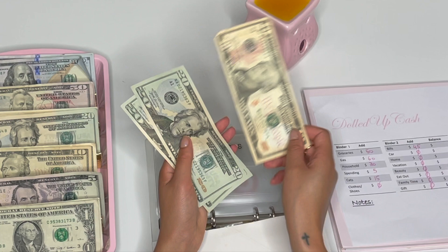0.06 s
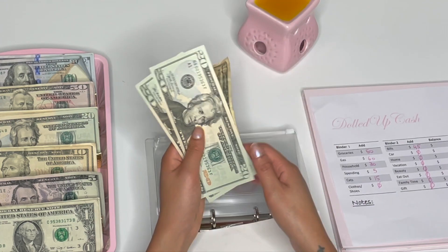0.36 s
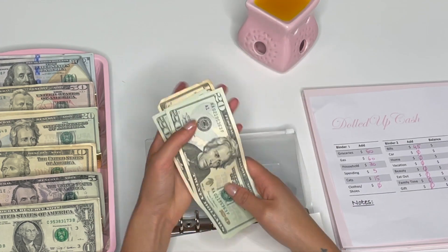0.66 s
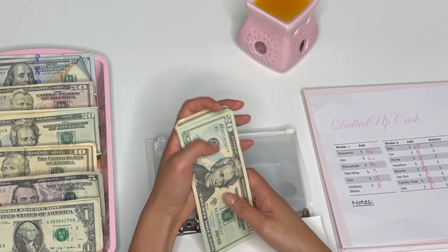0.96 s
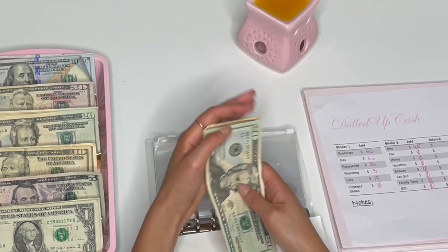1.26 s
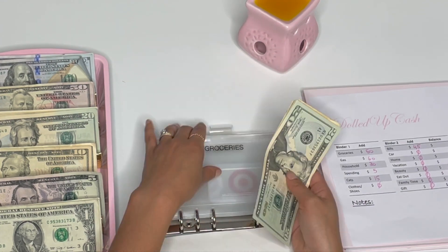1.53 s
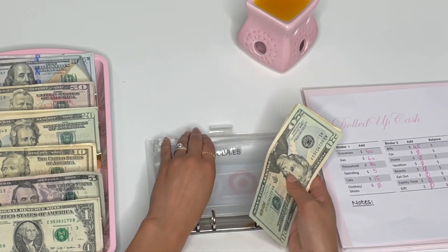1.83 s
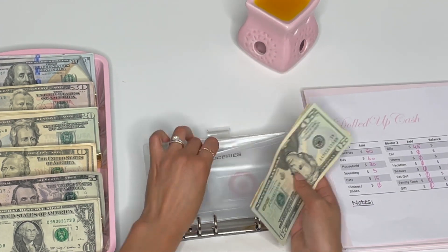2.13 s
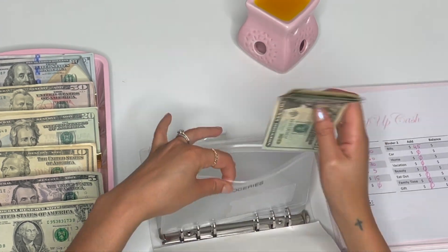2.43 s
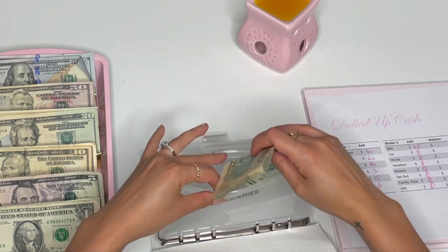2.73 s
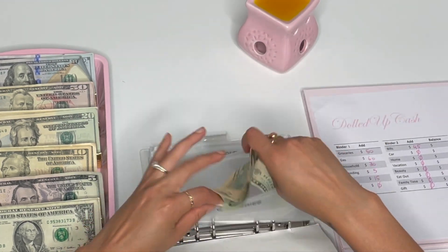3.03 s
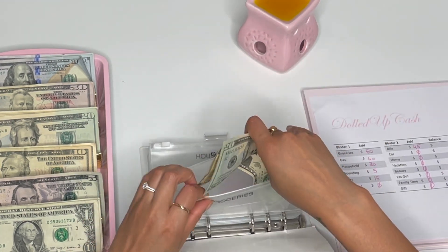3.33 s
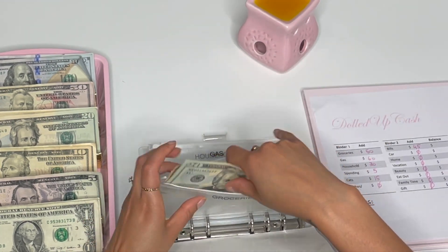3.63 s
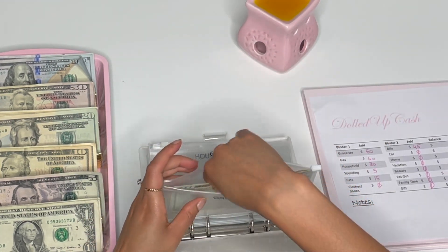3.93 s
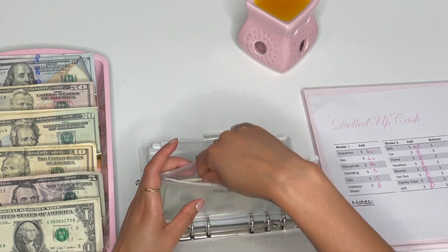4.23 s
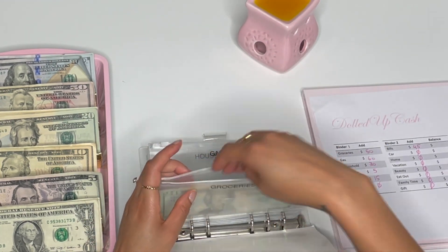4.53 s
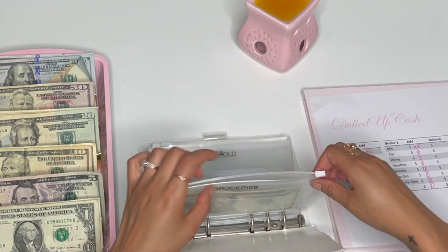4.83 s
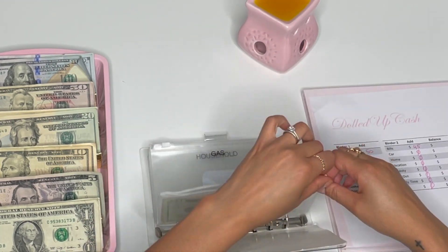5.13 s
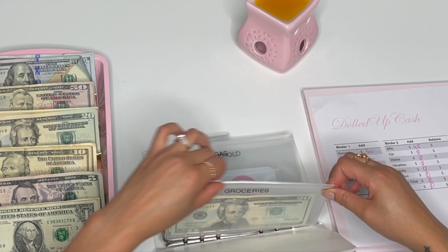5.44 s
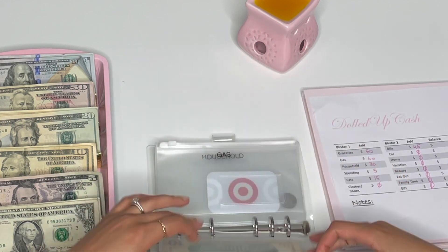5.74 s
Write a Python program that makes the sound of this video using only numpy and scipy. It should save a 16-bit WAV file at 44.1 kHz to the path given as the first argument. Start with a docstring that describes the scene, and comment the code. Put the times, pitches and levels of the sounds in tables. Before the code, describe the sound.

For the first second or so, paper banknotes rustle in short, crisp strokes close to the microphone, with a sharp crack at about 0.3 seconds and smaller snaps as they are squared. At 1.3 seconds hands land on the table with a soft, deep boom. Fingers rub a plastic binder pocket, and the cover knocks lightly near 1.9 seconds over a low rumble. At about 2.3 seconds the pocket opens with a loud pop. From 2.5 to 4.5 seconds the film crinkles and the notes slide in, with irregular sharp snaps, strongest around 2.6, 2.9 and 3.9 seconds. Lighter rustles and clicks follow as the pocket is closed and turned. Around 5.7 seconds the cover meets the table in a few quick hollow knocks, followed by last plastic snaps. The bare room gives a short echo and a faint, steady low background noise.

```python
"""At a table in a bare room, hands square a few banknotes and slip them into a plastic binder pocket.
Paper and film rustle in strokes made of tiny stick-slip clicks; creases snap, taut sheets crack, and
the pocket opens with a loud pop. Underneath, hands set the table booming softly and the binder's cover
knocks on it. A close pair of microphone ports hears it all, with the room's echo."""
import sys
import numpy as np
from scipy import signal
from scipy.fft import rfft, irfft, next_fast_len
from scipy.io import wavfile
from scipy.ndimage import uniform_filter1d

SR = 44100
rng = np.random.default_rng(int(sys.argv[2]) if len(sys.argv) > 2 else 0)


def wrap_up_sound(samples):
    """Save the sound to the file named by the first command line argument, as 16-bit audio."""
    columns = np.atleast_2d(samples).T
    # keep every value between -1 and 1, then stretch to whole-number steps
    tamed = np.clip(columns, -1, 1)
    steps = np.round(tamed * 32767).astype(np.int16)
    wavfile.write(sys.argv[1], SR, steps)


N = 264141
TOP_HZ = 15900

# room tone: (frequency [Hz], level [dB])
ROOM_TONE = [(20, -108), (60, -49), (200, -54), (500, -72), (2000, -76.5), (7000, -80), (15000, -110)]
# reverb decay: (frequency [Hz], t60 [s])
ROOM_DECAY = [(150, 0.76), (1000, 0.54), (4000, 0.57), (9000, 0.52), (15000, 0.55)]
# reverb width: (frequency [Hz], left-right correlation [0..1])
ROOM_CORRELATION = [(130, 0.67), (400, 0.65), (750, 0.023), (1100, 0.5), (1800, 1), (4000, 1), (14000, 1)]
# how far the right port leads the left: (frequency [Hz], phase [rad])
PORT_LEAD = [(2500, 0), (3300, 0.9), (5300, 0.5), (5800, 1.68), (6800, 0.98), (7600, 2), (10000, 4),
             (12200, 5), (13000, 2 * np.pi)]

# the table's boom: (frequency [Hz], level [dB], t60 [s])
TABLE_MODES = [(32.7, 4, 0.36), (51, -3.5, 1), (71, 3.5, 0.47)]
# hands landing on the table: (time [s], level [dB])
BUMPS = [(1.291, -31), (1.375, -59), (1.493, -50), (1.791, -63), (1.932, -53), (2.339, -47.5), (2.924, -54)]
# hands leaning and dragging on it: (start [s], length [s], level [dB])
LEANS = [(0.0, 0.21, -63.5), (0.858, 0.31, -59), (1.277, 0.26, -44.5), (1.782, 0.22, -47.5),
         (2.29, 0.37, -54.5), (2.899, 0.088, -47)]
# their rumble: (frequency [Hz], level [dB])
RUMBLE_EQ = [(15, -56), (45, -4.5), (68, -5.5), (90, -23), (200, -31), (800, -100)]
# the binder cover's hollow ring: (frequency [Hz], level [dB], t60 [s])
COVER_MODES = [(160, -2, 0.064), (226, 6.5, 0.052), (305, -5, 0.031)]
# the cover meeting the table: (time [s], level [dB])
KNOCKS = [(1.873, -45.5), (5.172, -54), (5.737, -42), (5.773, -47), (5.791, -40.5), (5.836, -50)]

# fingertips crossing the flat pocket: (start [s], length [s], level [dB])
DRAGS = [(1.473, 0.037, -63), (1.619, 0.029, -60), (4.177, 0.14, -64.5)]
# hands square the notes, open the pocket, slide them in, press them flat, close it and turn it over:
# (start [s], length [s], level [dB], bass weight [dB], crispness [dB])
STROKES = [ (0.0, 0.072, -45.5, -2, 9), (0.231, 0.099, -46, 1.5, 1), (0.275, 0.21, -50.5, -11, 11.5),
           (0.48, 0.17, -50.5, 3, 7.5), (0.69, 0.14, -60.5, -16, 18.5), (0.908, 0.058, -63.5, 5, 18),
           (1, 0.045, -46.5, 6, 12.5), (1.236, 0.02, -55, -32, 11), (1.48, 0.026, -53.5, 18, 9.5),
           (1.744, 0.52, -61.5, -14, -9), (1.888, 0.0093, -54, 19, 11), (2.033, 0.07, -52, -30, 10.5),
           (2.119, 0.093, -55, 16, 8), (2.179, 0.13, -41, -52, 7.5), (2.313, 0.064, -34.5, 5, -17),
           (2.578, 0.049, -41.5, -10, 10), (2.68, 0.085, -50, 4.5, 8), (2.811, 0.3, -44, -7, -6),
           (2.922, 0.095, -39.5, -3, 11), (3.046, 0.26, -53, 5, 2.5), (3.402, 0.077, -46, -2, 10.5),
           (3.528, 0.11, -50.5, 0.5, 11.5), (3.74, 0.19, -51, -36, 12.5), (3.914, 0.034, -39.5, 4, 6),
           (3.984, 0.053, -48, 6, 11), (4.153, 0.14, -50, 2.5, 5), (4.24, 0.056, -44.5, -6, 5),
           (4.392, 0.079, -49.5, 6.5, 7), (4.527, 0.054, -50.5, 10, 1), (4.772, 0.058, -49, 3.5, 4),
           (4.886, 0.11, -63.5, 7, -8), (5.084, 0.069, -50, -0.5, 2), (5.162, 0.17, -53.5, 8.5, 7),
           (5.34, 0.24, -64.5, -16, 20.5), (5.604, 0.17, -57, 2, 2), (5.693, 0.044, -42.5, 4.5, 17.5),
           (5.76, 0.15, -53.5, 13, -2), (5.931, 0.085, -49, 22, 14)]
# restless fingers under the strokes: (level [dB], bass weight [dB], crispness [dB])
FIDGET = (-64, 3.7, 0.5)
# gaps in the fidgeting: (start [s], end [s])
FIDGET_PAUSES = [(0.84, 1.21), (1.3, 1.482), (4.56, 4.765), (5.019, 5.6)]
# tone of rubbed paper: (frequency [Hz], level [dB])
PAPER_EQ = [(40, 14.5), (130, -5.5), (700, 5.5), (1500, -0.5), (2700, -1), (4200, -5.5), (5500, -6.5),
            (7200, -8.5), (10000, -11.5), (13500, -12.5), (16000, -22)]
# tone of rubbed plastic film: (frequency [Hz], level [dB])
FILM_EQ = [(40, 8), (130, -2.5), (700, 3.5), (1200, 1.5), (2400, -2.5), (3500, -6), (7000, -12.5),
           (10000, -19), (13500, -18), (16000, -30.5)]
# the film's resonance, shifting as it bends: (time [s], frequency [Hz])
FILM_BEND = [(1.5, 1970), (2.25, 2740), (2.36, 1140), (3.2, 1270), (3.9, 1730), (4.5, 1870), (5.3, 1760),
             (6, 1950)]

# taut sheets buckling: (time [s], level [dB], ring [Hz], overtone [dB])
CRACKS = [(0.3192, -23, 2650, 4), (0.7244, -38, 2380, 0), (1.024, -46, 1710, -6), (1.0344, -44, 1770, -8),
          (4.2859, -36.5, 2180, -4), (5.1645, -41, 2360, -6), (5.2655, -42, 2000, -2)]
# creases snapping through: (time [s], strength [dB], ring [Hz], crispness [dB])
SNAPS = [ (0.2452, -23.5, 2000, -9), (0.263, -21, 2770, 0), (0.4988, -21.5, 1220, -10),
         (0.529, -20, 1130, -28), (0.577, -16, 2200, -15), (0.7221, -26, 2410, 15), (0.765, -27, 2270, -20),
         (0.9974, -25, 1900, -5), (1.0127, -19.5, 1540, -5), (1.0321, -22.5, 1900, -6),
         (1.4752, -21.5, 1610, -3), (1.489, -23.5, 1490, -32), (1.927, -17.5, 1600, -5),
         (2.085, -26.5, 3800, 2), (2.193, -18.5, 4070, 2), (2.3102, -22.5, 1890, 23.5),
         (2.343, -28, 12000, 16.5), (2.4227, -9, 1070, -29), (2.5279, -12, 1130, -16),
         (2.6024, -11.5, 1170, -10), (2.619, -26, 6770, 13), (2.625, -7, 1510, 5.5), (2.713, -19, 1020, -3),
         (2.808, -22, 5250, 3.5), (2.829, -19.5, 2950, 5), (2.9094, -10, 1410, -7), (3.0283, -8, 1140, -27),
         (3.0662, -12, 1180, -18), (3.0714, -20.5, 2220, 11), (3.1243, -24, 2000, -11),
         (3.229, -21.5, 1270, -21), (3.573, -25.5, 2000, 11.5), (3.619, -21.5, 2400, -1),
         (3.6445, -21.5, 2500, -20), (3.839, -15, 1900, -1), (3.9192, -13.5, 2000, 9),
         (3.9228, -4.5, 1750, -15), (3.9995, -11.5, 1380, -9), (4.178, -23.5, 1760, -13),
         (4.2665, -17, 870, -1), (4.403, -22, 1780, -9), (4.415, -37.5, 2340, 21.5),
         (4.4337, -15.5, 1780, -12), (4.61, -31.5, 2000, 3.5), (4.765, -29.5, 2000, 0.5),
         (4.798, -28, 4700, 7.5), (4.905, -24.5, 2290, -12), (4.942, -24, 2190, -16),
         (5.166, -22, 1090, -6), (5.171, -31, 3020, 10), (5.234, -22.5, 3040, -7),
         (5.2962, -24.5, 2270, -1), (5.4288, -20.5, 2300, -1), (5.6788, -19.5, 2220, 1),
         (5.7099, -18.5, 5050, 13.5), (5.878, -27, 5200, 2.5), (5.9328, -12, 1970, 6.5),
         (5.952, -8, 1150, -20)]
# tone shared by all snaps: (frequency [Hz], level [dB])
SNAP_EQ = [(50, -13.5), (200, -8.5), (1000, 0.5), (3000, -2), (6000, -6), (10000, -8), (14000, -14.5),
           (16000, -27)]
# tone of the pocket's pop: (frequency [Hz], level [dB])
POP_EQ = [(100, -5), (500, 1), (1100, 9), (2400, 1), (2900, 1.5), (3350, 7), (4000, 1), (7000, -10.5),
          (13000, -35), (16000, -31)]
# the taut pocket ringing after it: (frequency [Hz], level [dB], t60 [s])
POCKET_MODES = [(612, -4, 0.16), (1000, 12, 0.072), (1330, 10.5, 0.037), (2407, 13, 0.036),
                (3200, 9, 0.011)]


def amp(db):
    """Decibels to gain."""
    return 10 ** (np.asarray(db) / 20)


def unit_rms(x):
    """Scales to rms 1."""
    return x / np.sqrt(np.mean(x ** 2) + 1e-20)


def curve(points, hz):
    """Reads a table on a log-frequency axis."""
    point_hz, value = np.transpose(points)
    return np.interp(np.log(hz + 1), np.log(point_hz + 1), value)


def bell(hz, centre_hz, octaves):
    """A resonant peak of height 1."""
    return np.exp(-(np.log2((hz + 1) / centre_hz) / octaves) ** 2)


def add(mix, start_s, sound):
    """Drops a sound into the mix."""
    part = mix[round(start_s * SR):][:len(sound)]
    part += sound[:len(part)]


def noise(eq):
    """Steady noise through an EQ curve."""
    return irfft(rfft(rng.standard_normal(N)) * amp(curve(eq, np.fft.rfftfreq(N, 1 / SR))), N)


def ring(modes):
    """One second of dying modes."""
    t = np.arange(SR) / SR
    return sum(amp(db - 60 * t / t60) * np.sin(2 * np.pi * hz * t) for hz, db, t60 in modes)


def gesture(t, start, length, attack_s=0.017, ease_db=8, release_db_per_s=239):
    """Envelope of a hand movement: it takes hold quickly, eases off, then lets go."""
    age = t - start
    fall_db = ease_db * np.clip(age / length, 0, 1) + release_db_per_s * np.maximum(age - length, 0)
    return np.clip(age / attack_s, 0, 1) * amp(-fall_db)


def touch(hz, weight_db, crisp_db):
    """EQ of a contact in dB: broad sheets add bass, sharp edges add treble."""
    bass_db = weight_db * curve([(250, 1), (1000, 0)], hz)
    return bass_db + crisp_db * curve([(1800, 0), (5000, .6), (11000, 1)], hz)


def room_response(wet_db=-2, early_db=-9.5, early_s=0.0067):
    """Quick reflections off the table and nearby things, then a tail whose bass lingers longest."""
    reflections = rng.standard_normal((2, SR)) * (rng.random((2, SR)) < 5000 / SR)
    hz, frame_s, (mid, side) = signal.stft(reflections, SR, nperseg=256)
    correlation = curve(ROOM_CORRELATION, hz)[:, None]
    mid, side = np.sqrt((1 + correlation) / 2) * mid, np.sqrt((1 - correlation) / 2) * side
    decay = amp(-60 * frame_s / curve(ROOM_DECAY, hz)[:, None])
    tail = signal.istft(np.array([mid + side, mid - side]) * decay, SR, nperseg=256)[1][:, :SR]
    t = np.arange(SR) / SR
    tail *= np.clip(t / .004 - .5, 0, 1)  # 2 ms pre-delay, 4 ms fade-in
    early = np.exp(-t / early_s)
    early_gain = amp(early_db) * early / np.linalg.norm(tail[0] * early)
    return tail * np.hypot(amp(wet_db) / np.linalg.norm(tail[0]), early_gain)


def room_echo(send, positions=4, cycle_s=0.5):
    """The hands move, so the echo crossfades round several patterns of reflections."""
    angle = np.pi * (np.arange(N) / SR / cycle_s + np.arange(positions)[:, None] / positions)
    fades = np.cos(angle) ** 4
    fades /= np.linalg.norm(fades, axis=0)
    return sum(signal.fftconvolve((send * fade)[None], room_response(), axes=1)[:, :N] for fade in fades)


def table_boom(attack_s=0.035, resting_db=-76, rumble_trim_db=-1):
    """Soft blows set the table top booming; resting and dragging hands make it rumble."""
    booms, t = np.zeros(N), np.arange(N) / SR
    boom = ring(TABLE_MODES) * (1 - np.exp(-t[:SR] / attack_s))
    for start, db in BUMPS:
        add(booms, start, amp(db) * boom)
    pressure = amp(resting_db) + sum(amp(db) * gesture(t, start, length) for start, length, db in LEANS)
    return booms + unit_rms(noise(RUMBLE_EQ)) * amp(rumble_trim_db) * pressure


def cover_knocks(attack_s=0.0032):
    """The binder's cover gives a short, hollow thud each time it meets the table."""
    out = np.zeros(N)
    thud = ring(COVER_MODES) * (1 - np.exp(-np.arange(SR) / SR / attack_s))
    for start, db in KNOCKS:
        add(out, start, amp(db) * thud)
    return out


def finger_drags(film_hz=1930, octaves=0.23):
    """Fingertips drag over the flat pocket, which answers in one narrow band."""
    t, hz = np.arange(N) / SR, np.fft.rfftfreq(N, 1 / SR)
    rub = unit_rms(irfft(rfft(rng.standard_normal(N)) * bell(hz, film_hz, octaves), N))
    return rub * sum(amp(db) * gesture(t, start, length) for start, length, db in DRAGS)


def slips(per_s, spread_db, hiss_db, low_hz, high_hz, decay_cycles, facets=24):
    """Tiny stick-slip clicks of uneven size, each ringing one facet of the sheet, over a sliding hiss."""
    sizes = amp(spread_db * np.minimum(rng.exponential(1, N), 3.5)) * rng.choice([-1, 1], N)
    clicks = sizes * (rng.random(N) < per_s / SR)
    facet = rng.integers(0, facets, N)
    crackle = np.zeros(N)
    for k, hz in enumerate(np.geomspace(low_hz, high_hz, facets)):
        pole = np.exp((2j * np.pi - 1 / decay_cycles) * hz / SR)
        crackle += hz * signal.lfilter([1], [1, -pole], clicks * (facet == k)).imag
    return unit_rms(unit_rms(crackle) + amp(hiss_db) * rng.standard_normal(N))


def rubbing_gain(hz, t):
    """A moving EQ: every stroke has its own touch, over the fingers' light fidgeting."""
    fidgeting = 1. - sum((t > start) & (t < end) for start, end in FIDGET_PAUSES)
    envelopes = [fidgeting] + [gesture(t, start, length) for start, length, *_ in STROKES]
    contacts = [FIDGET] + [stroke[2:] for stroke in STROKES]
    tones = [amp(db + touch(hz, weight_db, crisp_db)) for db, weight_db, crisp_db in contacts]
    return np.sqrt(np.square(tones).T @ np.square(envelopes))


def rustle(paper_until_s=1.3, paper_db=-6.5, film_db=-6, bend_db=3, clump_db=3, fine_db=4):
    """Clumps of slips sound through paper, then film: coarse ones for body, fine ones for sizzle."""
    clumps = unit_rms(uniform_filter1d(uniform_filter1d(rng.standard_normal(N), size=500), size=100))
    coarse = slips(per_s=1100, spread_db=3.6, hiss_db=-2, low_hz=201.4, high_hz=4764, decay_cycles=3.73)
    fine = slips(per_s=900, spread_db=1.5, hiss_db=4.5, low_hz=2870, high_hz=15000, decay_cycles=4.4)
    coarse *= amp(clump_db * clumps)
    fine *= amp(fine_db + clump_db * clumps / 2)
    frames = dict(nperseg=256, noverlap=192, nfft=512)
    hz, t, (coarse, fine) = signal.stft(np.array([coarse, fine]), SR, **frames)
    rubbing = rubbing_gain(hz, t)
    hz = hz[:, None]
    bend_hz = np.interp(t, *np.transpose(FILM_BEND))
    film_eq = film_db + curve(FILM_EQ, hz) + bend_db * bell(hz, bend_hz, octaves=0.21)
    sheet_eq = np.where(t < paper_until_s, paper_db + curve(PAPER_EQ, hz), film_eq)
    fine_share = curve([(2800, 0), (6000, 1)], hz)
    texture = np.sqrt(1 - fine_share) * coarse + np.sqrt(fine_share) * fine
    return signal.istft(texture * amp(sheet_eq) * rubbing, SR, **frames)[1][:N]


def sheet_cracks(overtone_ratio=2.04, decay_cycles=1.55):
    """A taut sheet buckles in one clean crack: two modes that die within a few cycles."""
    out, t = np.zeros(N), np.arange(1024) / SR
    for start, db, hz, overtone_db in CRACKS:
        low, high = (np.exp(-f * t / decay_cycles) * np.sin(2 * np.pi * f * t)
                     for f in (hz, overtone_ratio * hz))
        add(out, start, amp(db) * (amp(overtone_db) * high - low))
    return out


def sharpest_pulse(eq_db):
    """The tightest transient with this spectrum (minimum phase)."""
    log_gain = np.log(amp(np.r_[eq_db, eq_db[-2:0:-1]]))
    return np.fft.ifft(np.exp(np.conj(signal.hilbert(log_gain)))).real[:len(eq_db)]


def sheet_flip(eq_db, chatter_db, chatter_s, delay_at_1khz_s=0.00039):
    """A sheet flips with a sharp pulse and pitchless chatter; bending waves carry the treble out first."""
    t, hz = np.arange(4096) / SR, np.fft.rfftfreq(8192, 1 / SR)
    chatter = rng.standard_normal(len(t)) * np.exp(-t / chatter_s)
    push = signal.unit_impulse(len(t)) + amp(chatter_db) * chatter / np.linalg.norm(chatter)
    for _ in range(3):  # flattens the spectrum, so the EQ alone sets the tone
        push = irfft(np.exp(1j * np.angle(rfft(push, 8192))))[:len(t)]
    pulse = signal.fftconvolve(push / np.linalg.norm(push), sharpest_pulse(eq_db))
    dispersion = np.exp(-4j * np.pi * delay_at_1khz_s * np.sqrt(1000 * hz))
    return irfft(rfft(pulse, 8192) * dispersion)[:len(t)]


def crease_snaps(ring_db=7, trim_db=-2, raggedness=0.59):
    """Each crease flips and rings briefly; the weaker the snap, the more ragged its chatter."""
    out, hz = np.zeros(N), np.fft.rfftfreq(2048, 1 / SR)
    for start, db, ring_hz, crisp_db in SNAPS:
        weight_db = 5 - 2 * np.log2(ring_hz / 2000)  # a broad facet rings low and pushes more air
        resonance_db = ring_db * bell(hz, ring_hz, octaves=0.5)
        eq_db = curve(SNAP_EQ, hz) + resonance_db + touch(hz, weight_db, crisp_db)
        snap = sheet_flip(eq_db, chatter_db=-4 - raggedness * db, chatter_s=0.0041)
        add(out, start, amp(db + trim_db) * snap)
    return out


def pocket_pop(start_s=2.3277, ring_db=-43):
    """The pocket's mouth pops open, crumples and rings briefly."""
    out, hz = np.zeros(N), np.fft.rfftfreq(2048, 1 / SR)
    add(out, start_s, sheet_flip(curve(POP_EQ, hz), chatter_db=-6, chatter_s=0.014))
    add(out, start_s, amp(ring_db) * ring(POCKET_MODES))
    return out


def scene(crack_send_db=-7, knock_send_db=-7):
    """Paper and plastic over a bed of table boom and room tone; cracks and knocks get less reverb."""
    sheets = rustle() + finger_drags() + crease_snaps() + pocket_pop()
    cracks, knocks = sheet_cracks(), cover_knocks()
    reverb = room_echo(sheets + amp(crack_send_db) * cracks + amp(knock_send_db) * knocks)
    return sheets + cracks + knocks + reverb + table_boom() + noise(ROOM_TONE)


def record(dry):
    """The two microphone ports hear the treble out of phase; a steep low-pass trims the top."""
    size = next_fast_len(N + 4096)
    lead = curve(PORT_LEAD, np.fft.rfftfreq(size, 1 / SR))
    pair = irfft(rfft(dry, size) * np.exp(.5j * np.array([-lead, lead])), size)[:, :N]
    low_pass = signal.firwin(255, TOP_HZ, window=("kaiser", 9), fs=SR)
    return signal.oaconvolve(pair, low_pass[None], "same")


dry = scene()
out = record(dry)
wrap_up_sound(out)
```